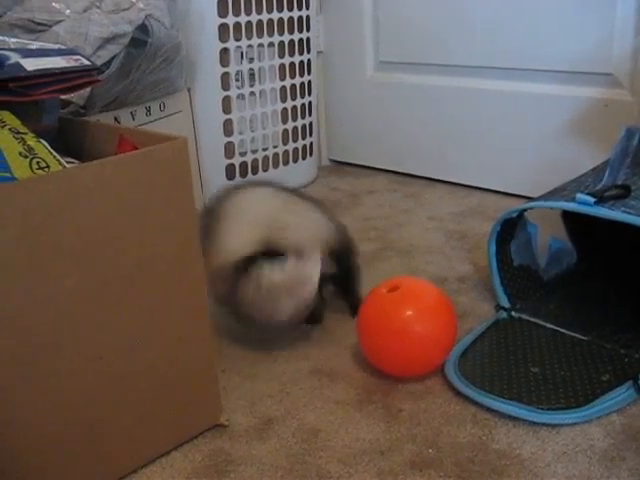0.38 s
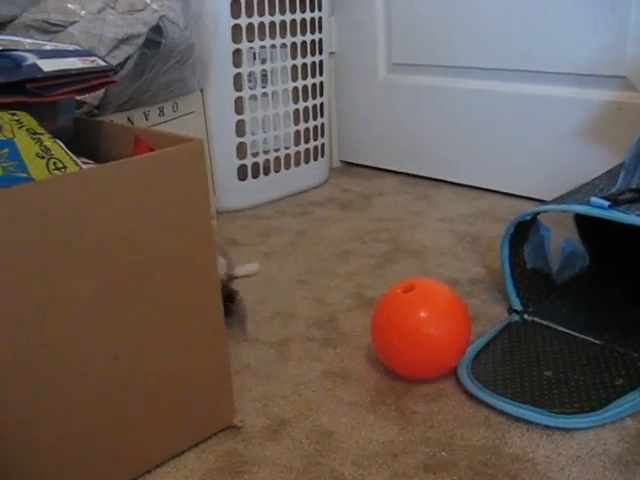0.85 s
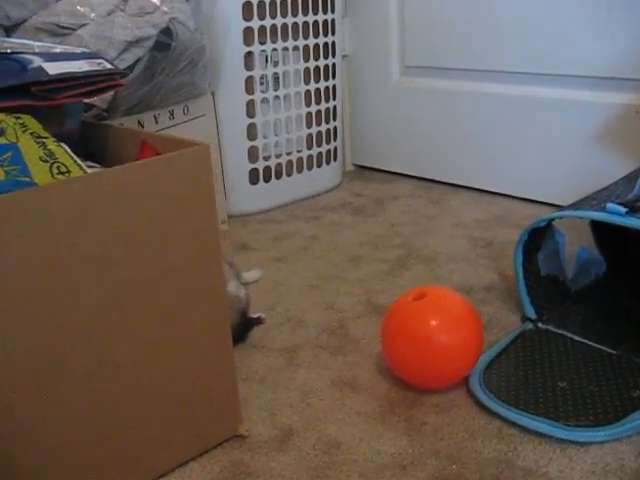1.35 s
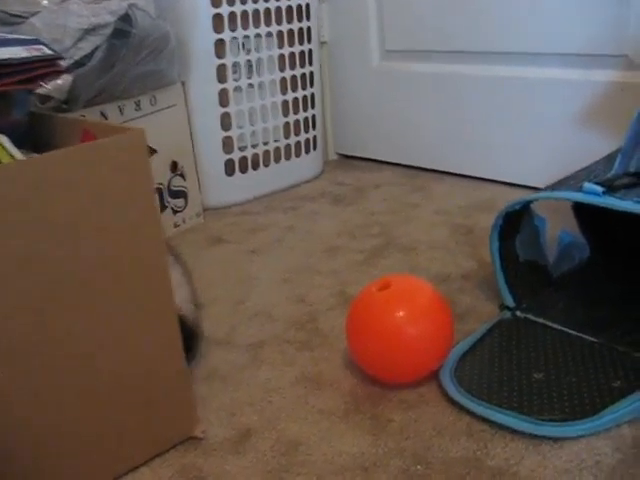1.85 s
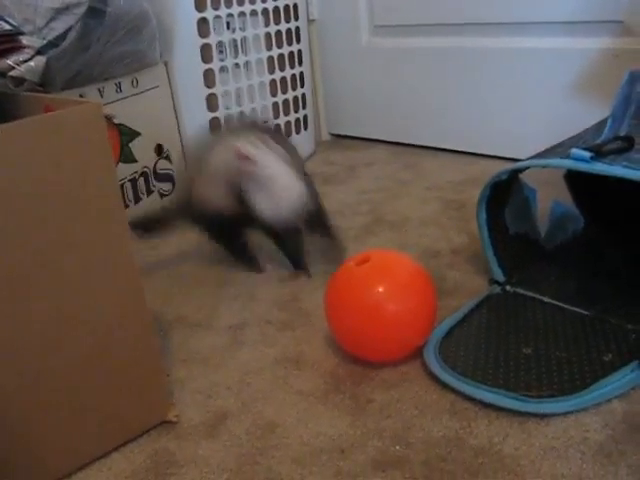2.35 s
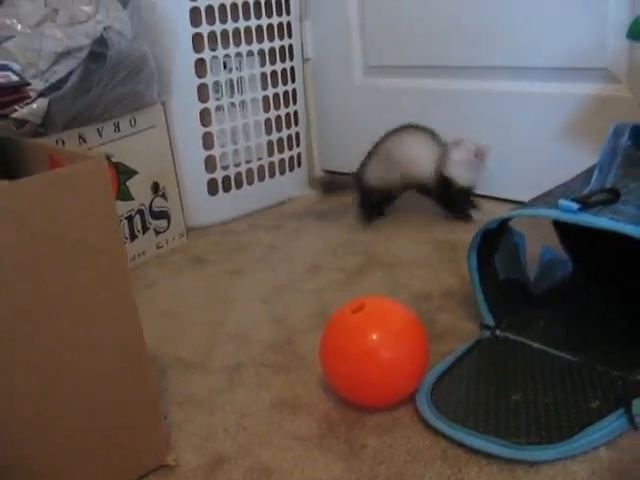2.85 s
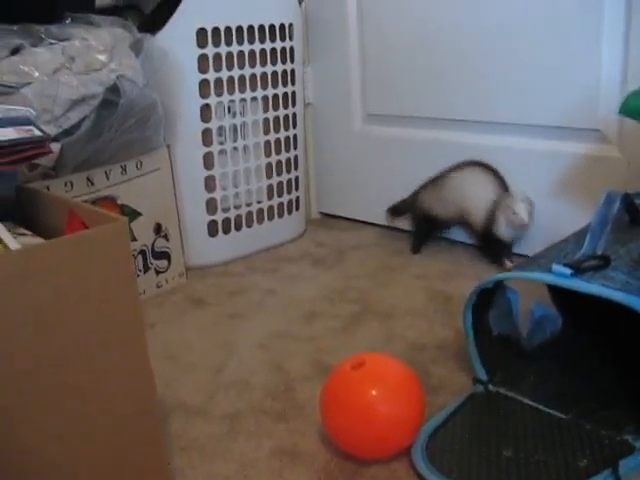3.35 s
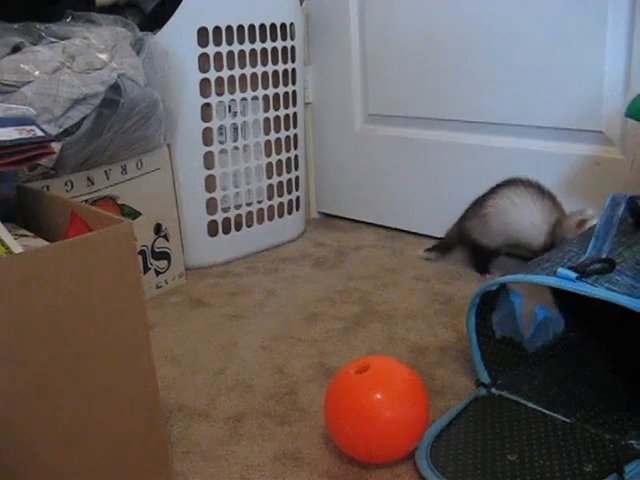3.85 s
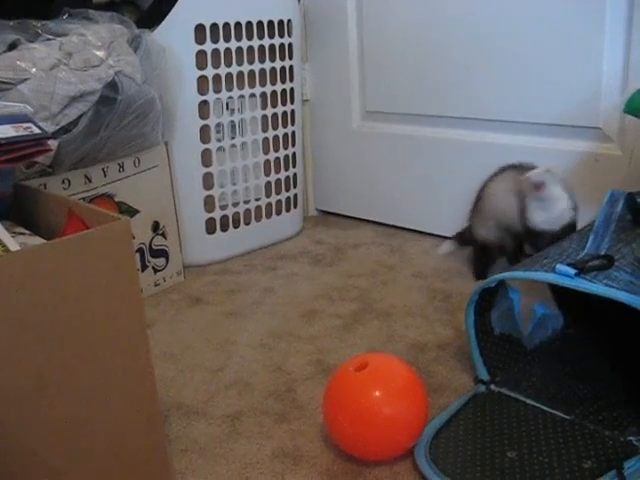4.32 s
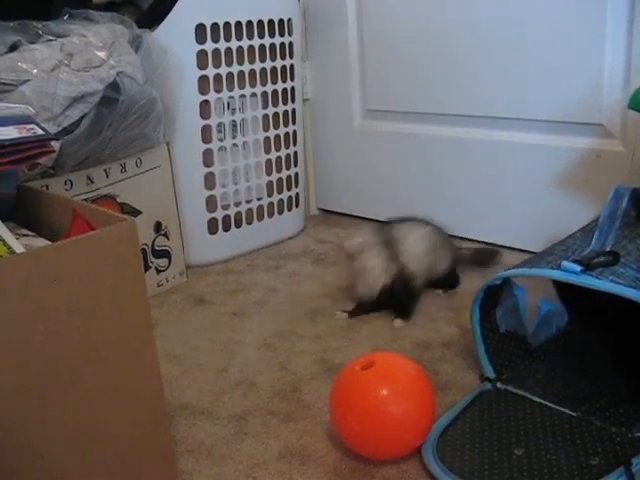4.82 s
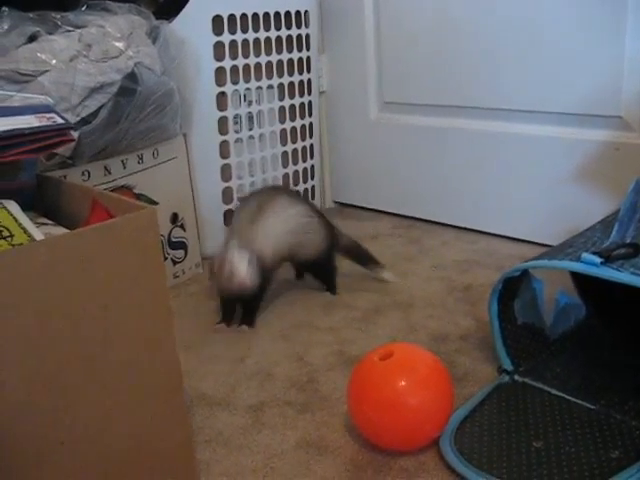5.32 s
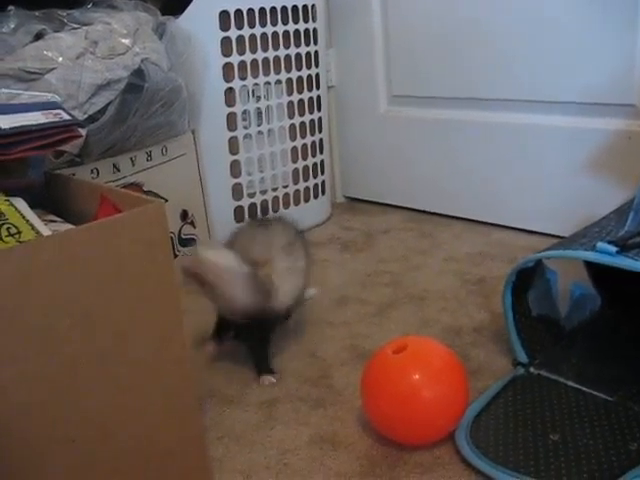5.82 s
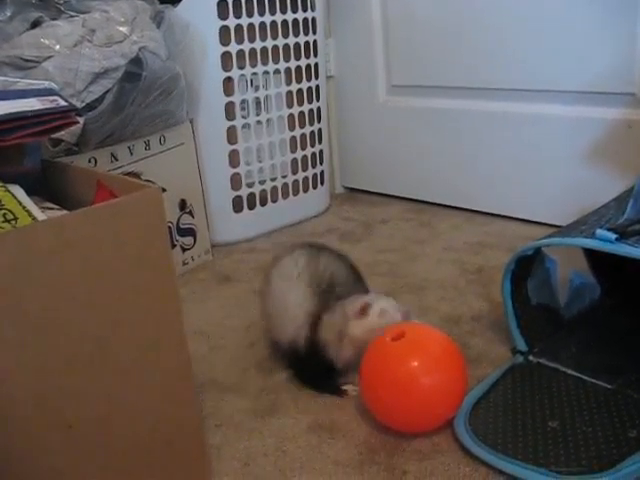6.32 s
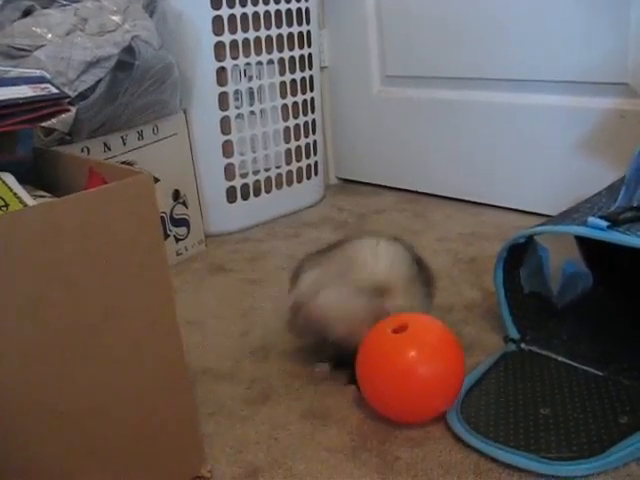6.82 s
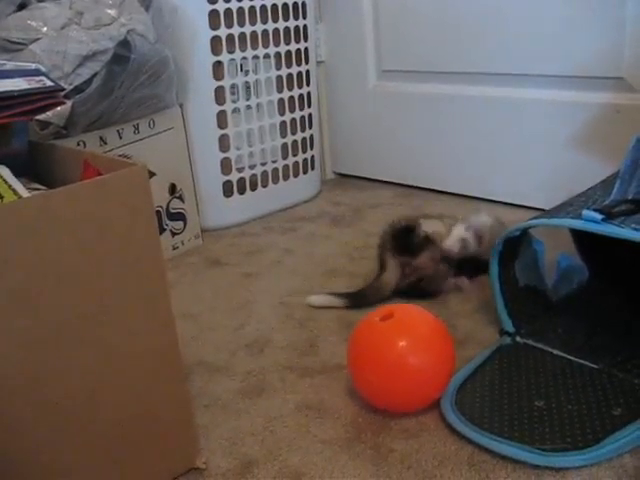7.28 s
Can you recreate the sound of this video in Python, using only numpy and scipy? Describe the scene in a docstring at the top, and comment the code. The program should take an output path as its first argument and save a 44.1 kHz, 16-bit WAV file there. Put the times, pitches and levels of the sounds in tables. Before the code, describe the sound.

A small animal scampers around a hollow plastic ball on carpet, claws scratching and ticking, with knocks and low thuds over a throbbing motor hum.

```python
"""A motor hum, a low double throb and a gritty hiss fill a small cluttered room; then a small animal hops
around a plastic ball on carpet. Its claws scuff, tick and squeak, its body knocks hollow things, landings thud.
Hum is wavering sines, hiss is shaped noise, thuds and throbs are sines with rumble; scuffs are ringing grains,
ticks ringing impulses, knocks decaying partials, squeaks sagging tones, and a faint late whistle thin noise.
A small 8-bit recorder dulls the treble, adds grit and turns its gain down after loud sounds."""
import sys
import numpy as np
from scipy import signal
from scipy.fft import rfft, irfft, next_fast_len
from scipy.io import wavfile
from scipy.ndimage import uniform_filter1d

SR = 44100
rng = np.random.default_rng(int(sys.argv[2]) if len(sys.argv) > 2 else 0)


def voltage_ratio(decibels):
    """Convert decibels (scalar or array-like) to amplitude ratios, 20 dB per decade."""
    exponent = np.asarray(decibels, float) / 20
    return 10 ** exponent


def generate_wav(sig):
    """Save sig (samples, or channels by samples) to the path in sys.argv[1] as 16-bit PCM at SR."""
    pcm = np.round(np.clip(np.atleast_2d(sig).T, -1, 1) * 32767).astype(np.int16)
    wavfile.write(sys.argv[1], SR, pcm)


N = 327222


def rms_one(x):
    """Scales a sound to unit power."""
    return x / np.sqrt(np.mean(x ** 2) + 1e-20)


def peak_at(x, peak_db):
    """Scales a sound to a peak level."""
    return voltage_ratio(peak_db) * x / np.max(np.abs(x))


def add(out, start_s, sound):
    """Mixes a short sound in at its start time."""
    i = round(start_s * SR)
    out[i:i + len(sound)] += sound[:N - i]


def drift(rate_hz):
    """Slow random wander of unit power, made at a fortieth of the sample rate."""
    r = np.exp(-2 * np.pi * rate_hz * 40 / SR)
    noise = rng.standard_normal(N // 40 + 2002)
    slow = signal.lfilter([1], [1, -2 * r, r * r], noise)[2000:]
    return np.interp(np.arange(N) / 40, np.arange(len(slow)), rms_one(slow))


def resonance(x, pitch_hz, width_hz):
    """A two-pole resonance with a peak gain of about 1."""
    r = np.exp(-np.pi * width_hz / SR)
    feed = np.array([1, 0, -1]) * (1 - r * r) / 2
    return signal.lfilter(feed, [1, -2 * r * np.cos(2 * np.pi * pitch_hz / SR), r * r], x)


# motor tones: pitch_hz [Hz], level_db [dB rms], waver_db [dB, spread of the level]
MOTOR_TONES = [(120.22, -43, 0.4), (240.9, -62, 1), (294.2, -69, 5.5), (2600, -72, 0.5)]


def hum():
    """Steady motor tones, each a sine whose level wavers on its own."""
    t = np.arange(N) / SR
    out = np.zeros(N)
    for pitch_hz, level_db, waver_db in MOTOR_TONES:
        level = np.sqrt(2) * voltage_ratio(level_db + waver_db * drift(2.6))
        out += level * np.sin(2 * np.pi * (pitch_hz * t + rng.random()))
    return out


# colour of the room and microphone noise: pitch_hz [Hz], density_db [relative dB per Hz]
HISS_COLOUR = [(20, -31.5), (40, -20.5), (70, -22), (100, -19), (160, -24), (260, -26), (450, -27),
               (1000, -32), (2250, -33), (2600, -29), (3200, -35.5), (4500, -34.5), (6500, -37.5)]


def hiss(level_db=-51, breath_db=0.5):
    """White noise shaped to the colour curve, breathing slightly; level_db is its rms from 300 to 7000 Hz."""
    size = next_fast_len(N)
    hz = np.arange(size // 2 + 1) * SR / size + 0.00085   # the offset keeps the log finite
    pitch_hz, density_db = np.transpose(HISS_COLOUR)
    shape = voltage_ratio(np.interp(np.log(hz), np.log(pitch_hz), density_db))
    noise = irfft(rfft(rng.standard_normal(size)) * shape, size)
    band = irfft(rfft(noise) * (hz > 300) * (hz < 7000), size)
    return (noise / np.std(band))[:N] * voltage_ratio(level_db + breath_db * drift(6.8))


def low_swell(level_db, pitch_hz, t60_s, rise_s=0.011, rumble_db=-8, rumble_hz=90):
    """A low tone with a rough rumble on top, swelling and dying; level_db is taken before the envelope."""
    t = np.arange(32768) / SR
    swell = (1 - np.exp(-t / rise_s)) * voltage_ratio(-60 * t / t60_s)
    rumble = rms_one(resonance(rng.standard_normal(len(t)), rumble_hz, rumble_hz))
    tone = np.sin(2 * np.pi * pitch_hz * t)
    return voltage_ratio(level_db) * swell * (tone + voltage_ratio(rumble_db) * rumble)


def throbs(first_s=-0.026, turn_s=1.229, gap_s=0.19, first_db=-42.5, second_db=-44, spread_db=1):
    """The appliance throbs twice per turn, each throb a low swell of slightly varied level."""
    out = np.zeros(N)
    for turn in range(7):
        for late_s, level_db in ((0, first_db), (gap_s, second_db)):
            start_s = first_s + turn * turn_s + late_s
            throb = low_swell(level_db + spread_db * rng.standard_normal(), 73.3, 0.42)
            if start_s < N / SR:
                add(out, max(start_s, 0), throb)
    return out


# claws dragged over carpet and cardboard: loudest_s [s], level_db [dB rms of the ringing part],
# colour_hz [Hz], fade_s [s], broad_db [dB, rustle over the ringing part]
CLAW_SCUFFS = [(0.342, -54, 4360, 0.017, 16.5), (.562, -36.5, 4210, 0.015, 2.5),
               (0.577, -31.5, 4030, 0.0043, -14.5), (.635, -54, 3920, 0.046, 10.5),
               (1.682, -26, 3980, 0.014, -4.5), (1.712, -29, 3690, 0.021, -5.5),
               (1.718, -27, 2350, 0.013, -3.5), (1.746, -25.5, 5270, 0.0092, -3.5),
               (1.884, -31.5, 1547, 0.018, -1.5), (1.888, -33, 3660, 0.031, -3.5),
               (1.912, -26, 4120, 0.022, -10.5), (1.911, -32.5, 5210, 0.023, -35),
               (1.934, -27, 4150, 0.0083, -10), (2.053, -31.5, 3810, 0.0072, -11.5),
               (2.078, -45, 2054, 0.01, 5.5), (2.449, -35, 4010, 0.014, -21.5),
               (2.465, -27.5, 3880, 0.0065, -11), (2.49, -45, 1583, 0.016, -4.5),
               (3, -42.5, 3640, 0.015, 6.5), (3.03, -47, 2740, 0.011, -12.5),
               (4.179, -52.5, 1710, 0.023, 3), (4.315, -43.5, 2600, 0.0034, -13),
               (4.363, -30.5, 2230, 0.007, -24.5), (4.376, -37, 2870, 0.008, -1.5),
               (4.442, -37, 3770, 0.009, 2.5), (4.468, -40.5, 1554, 0.018, 3),
               (4.47, -44.5, 2600, 0.012, 5), (4.545, -52, 2190, 0.037, 6), (5.04, -40.5, 3280, 0.011, -9),
               (6.226, -41, 3540, 0.011, -14), (6.556, -38, 3190, 0.01, -5.5),
               (7.111, -35, 4170, 0.011, -1.5), (7.163, -46, 1500, 0.012, 8.5)]


def scuffs(grains_per_s=5500, spread_db=2.0, sharpness=5.9, scatter=0.17, dull_db=-4.0, swell_share=0.69):
    """Fibres snap under the claw: each grain rings at one of five pitches near the colour, over a broad rustle."""
    out, t = np.zeros(N), np.arange(-2048, 8192) / SR
    fibres = np.linspace(-1.5, 1.5, 5)
    for loudest_s, level_db, colour_hz, fade_s, broad_db in CLAW_SCUFFS:
        born, size, sign, dealt = rng.random((4, len(t)))
        grains = (born < grains_per_s / SR) * voltage_ratio(-spread_db * np.log(size + 0.005)) * np.sign(sign - 0.5)
        fibre = (dealt * len(fibres)).astype(int)
        body = 0.076 * resonance(grains, colour_hz, colour_hz)   # a wide skirt under the fibres
        for k, offset in enumerate(fibres):
            snaps = resonance(grains * (fibre == k), colour_hz, colour_hz)
            ring = resonance(snaps, colour_hz * np.exp(scatter * offset), colour_hz / sharpness)
            body += np.exp(-offset ** 2 / 2) * ring
        bright = rms_one(resonance(grains, 1600, 4400))
        dull = rms_one(resonance(grains, 470, 850))
        rustle = bright + voltage_ratio(dull_db) * dull
        swell = np.exp(-(t / (swell_share * fade_s)) ** 2)
        stroke = np.where(t < 0, swell, np.exp(-t / fade_s))
        add(out, loudest_s + t[0], voltage_ratio(level_db) * (rms_one(body) + voltage_ratio(broad_db) * rustle) * stroke)
    return out


# single claw ticks: start_s [s], peak_db [dB], colour_hz [Hz], width_hz [Hz, of the ring]
CLAW_TICKS = [(0.5282, -16.5, 4510, 1500), (0.5324, -20.5, 1430, 900), (1.669, -17, 3630, 500),
              (1.679, -11, 3530, 2500), (1.8691, -11.5, 2590, 1500), (1.873, -14, 1727, 356),
              (2.0444, -17, 3740, 519), (2.0435, -20.5, 5640, 614), (2.2184, -16, 4160, 1317),
              (2.44, -19.5, 3780, 700), (3.0005, -22, 3380, 890), (3.7752, -23.5, 3850, 590),
              (4.3561, -28.5, 3180, 600), (4.3733, -29, 3010, 1200), (4.437, -20.5, 1410, 450),
              (4.4769, -17.5, 2720, 1485), (5.0389, -25, 3730, 643), (5.8665, -25.5, 3990, 483),
              (6.2107, -24, 3634, 446), (6.219, -16, 3754, 435), (6.346, -29.5, 4010, 1190),
              (6.556, -28.5, 2730, 900), (7.107, -24, 4000, 1590), (7.159, -25.5, 4010, 900)]


def ticks(crack_db=-6, fibres_db=-27, fibres_s=0.006):
    """A claw tip lets go: an impulse rings over a faint broad crack, and plucked fibres rustle in its colour."""
    out, click, t = np.zeros(N), np.eye(1, 4096)[0], np.arange(4096) / SR
    crack = peak_at(resonance(click, 1600, 3000), crack_db)   # levels here are against the ring's peak
    spring_back = voltage_ratio(fibres_db) * t / fibres_s * np.exp(1 - t / fibres_s)   # loudest at fibres_s
    for start_s, peak_db, colour_hz, width_hz in CLAW_TICKS:
        ring = resonance(resonance(click, colour_hz, 2 * width_hz), colour_hz, width_hz)
        noise = resonance(rng.standard_normal(len(t)), colour_hz, colour_hz / 2)
        rustle = rms_one(resonance(noise, colour_hz, width_hz)) * spring_back
        add(out, start_s, peak_at(peak_at(ring, 0) + crack + rustle, peak_db))
    return out


# knocks on hollow things: start_s [s], peak_db [dB], pitch_hz [Hz], t60_s [s], hard_db [dB on the overtones]
BODY_KNOCKS = [(0.533, -21.5, 212.6, 0.068, 4), (.536, -21, 776, 0.08, 0.5), (1.682, -16, 470, 0.032, -5.5),
               (1.6825, -17, 885, 0.094, -2), (1.71, -28.5, 593, 0.06, -3.5),
               (1.7528, -7, 230.7, 0.06, -4.5), (1.769, -20.5, 134, 0.18, -15),
               (1.841, -25, 200.5, 0.072, 2), (1.876, -35, 475, 0.2, 5.5),
               (2.375, -38.5, 183.3, 0.25, -0.5), (2.987, -28, 214, 0.1, -1),
               (3.015, -35.5, 280, 0.14, -16), (4.376, -30.5, 833, 0.06, -14.5),
               (4.392, -36, 857, 0.08, -14.5), (4.4381, -19.5, 299.5, 0.084, -2.5),
               (4.478, -21.5, 394, 0.14, 10), (6.094, -35.5, 264.5, 0.14, 7.5), (6.17, -34, 196.7, 0.14, 3),
               (6.352, -16.5, 432, 0.011, -3.5), (6.355, -28.5, 270.2, 0.38, -3.5),
               (7.165, -42.5, 505.6, 0.46, -19)]
# partials of a hollow body: ratio [of the pitch], level_db [dB], t60_share [of the knock's t60]
HOLLOW_PARTIALS = [(1, -5, 0.81), (1.9, -11, 0.41), (3.1, -12.5, 0.14)]


def knocks(scatter=0.12, rattle_db=-23, first_db=5.0, first_cycles=1.9, slap_db=-11, slap_cycles=2.5):
    """A blow rings a hollow body, first cycles strongest; loose walls rattle and slap back three times, ever weaker."""
    out, t = np.zeros(N), np.arange(16384) / SR
    for start_s, peak_db, pitch_hz, t60_s, hard_db in BODY_KNOCKS:
        ring = np.zeros(len(t))
        for k, (ratio, level_db, t60_share) in enumerate(HOLLOW_PARTIALS):
            overtone = k > 0
            detune = 1 + scatter * rng.standard_normal() if overtone else 1
            level = voltage_ratio(level_db + hard_db * overtone - 60 * t / (t60_s * t60_share))
            ring -= level * np.sin(2 * np.pi * pitch_hz * ratio * detune * t)
        loose = resonance(rng.standard_normal(len(t)), 1.25 * pitch_hz, 0.75 * pitch_hz)
        loose = rms_one(signal.lfilter(*signal.butter(2, 2 * pitch_hz, fs=SR), loose))
        ring += loose * voltage_ratio(rattle_db - 40 * t / t60_s)
        cycles = t * pitch_hz
        boost = voltage_ratio(first_db * np.exp(-(cycles / first_cycles) ** 2))
        blow = ring * boost * np.minimum(cycles / 0.37, 1)   # a short ramp softens the onset
        add(out, start_s, peak_at(blow, peak_db))
        slap = blow * voltage_ratio(-60 * cycles / 10)
        for k, late in enumerate(np.cumsum(0.5 + rng.random(3))):   # uneven gaps, slap_cycles on average
            add(out, start_s + late * slap_cycles / pitch_hz, peak_at(slap, peak_db + slap_db * (1 + k / 2)))
    return out


# a claw skids and squeaks for a few cycles: loudest_s [s], peak_db [dB], pitch_hz [Hz], half_s [s, half length]
CLAW_SQUEAKS = [(1.675, -12.5, 3900, 0.0016), (1.715, -25.5, 2940, 0.00097), (1.888, -22, 3870, 0.002),
                (1.905, -24.5, 4050, 0.002), (1.923, -20, 4140, 0.002), (2.46, -24, 4284, 0.0015),
                (4.3598, -23, 2915, .0017)]


def squeaks(sag=0.034):
    """A skidding claw gives a short tone that swells and dies, its pitch sagging by the share sag per half length."""
    out, t = np.zeros(N), np.arange(-400, 401) / SR
    for loudest_s, peak_db, pitch_hz, half_s in CLAW_SQUEAKS:
        turns = pitch_hz * t * (1 - sag * t / half_s / 2) + rng.random()
        add(out, loudest_s + t[0], voltage_ratio(peak_db) * np.exp(-(t / half_s) ** 2) * np.sin(2 * np.pi * turns))
    return out


# landings on the floor: start_s [s], level_db [dB before the envelope], pitch_hz [Hz]
LANDINGS = [(1.752, -27, 89.5), (2.982, -20.5, 103.1), (3.012, -22, 59.3), (3.058, -31, 83.1)]


def thuds():
    """The animal lands and the floor swells and rings low."""
    out = np.zeros(N)
    for start_s, level_db, pitch_hz in LANDINGS:
        add(out, start_s, low_swell(level_db, pitch_hz, 0.29))
    return out


# a faint whistle: pitch_hz [Hz], width_hz [Hz], level_db [dB rms before the envelope]
WHISTLE = (4400, 290, -48)


def wheeze(loudest_s=6.975, half_s=0.028):
    """A faint whistle: noise in a thin resonance, swelling and dying once."""
    pitch_hz, width_hz, level_db = WHISTLE
    air = resonance(resonance(rng.standard_normal(N), pitch_hz, width_hz), pitch_hz, width_hz)
    swell = np.exp(-((np.arange(N) / SR - loudest_s) / half_s) ** 2)
    return voltage_ratio(level_db) * rms_one(air) * swell


def room(x, bass_t60_s=0.24, wall_cut_hz=8400):
    """Ten feedback delays, duller on every round, then scattered by clutter in three all-pass echoes."""
    out, dull = np.zeros(N), np.exp(-2 * np.pi * wall_cut_hz / SR)
    for k, lag in enumerate((rng.uniform(0.006, 0.025, 10) * SR).astype(int)):
        loop, gain, state = x.copy(), voltage_ratio(-60 * lag / SR / bass_t60_s), [0.]
        for i in range(lag, N, lag):
            back, state = signal.lfilter([gain * (1 - dull)], [1, -dull], loop[i - lag:i], zi=state)
            loop[i:i + lag] += back[:N - i]
        out += (loop - x) * (-1) ** k
    for lag in (47, 113, 191):   # samples
        echo = np.zeros(lag + 1)
        echo[0], echo[lag] = -0.6, 1
        out = signal.lfilter(echo, echo[::-1], out)
    return out


def scene():
    """The animal in the room over the steady background."""
    background = hum() + hiss() + throbs()
    claws = scuffs() + ticks() + squeaks() + wheeze() + 1e-18   # the speck avoids slow, vanishing numbers
    blows = signal.lfilter(*signal.butter(2, 90, "high", fs=SR), knocks())   # small bodies radiate no deep bass
    wet = room(claws + 0.75 * blows)   # carpet and boxes soak up part of the blows
    return (background + claws + blows + voltage_ratio(-18) * wet + thuds())[None]


def top_cut(x):
    """Nothing passes above the cut-off."""
    return signal.sosfilt(signal.butter(12, 7110, fs=SR, output="sos"), x)


def record(dry, knee_db=-36, slope=0.069, release_db_per_s=0.5, attack_s=0.07):
    """The microphone dulls the treble; gain ducks after loud sounds and creeps back; a coarse converter adds grit."""
    x = signal.sosfilt(signal.butter(7, 5600, fs=SR, output="sos"), dry[0])
    t = np.arange(N) / SR
    level_db = 10 * np.log10(uniform_filter1d(x ** 2, size=4410) + 1e-12)
    over_db = slope * np.maximum(level_db - knee_db, 0)
    held_db = np.maximum.accumulate(over_db + release_db_per_s * t) - release_db_per_s * t
    r = np.exp(-1 / (attack_s * SR))
    x = x * voltage_ratio(-signal.lfilter([1 - r], [1, -r], held_db))
    every, steps_per_unit = 4, 128   # keeps every fourth sample; 8 bits
    steps = np.floor(x[::every] * steps_per_unit) / steps_per_unit
    smoother = signal.firwin(65, 1 / every, window=("kaiser", 9))   # leaves a mirror of the top
    x = signal.resample_poly(steps, every, 1, window=smoother)[:N]
    return top_cut(x[None])


dry = scene()
out = record(dry)
generate_wav(out)
```